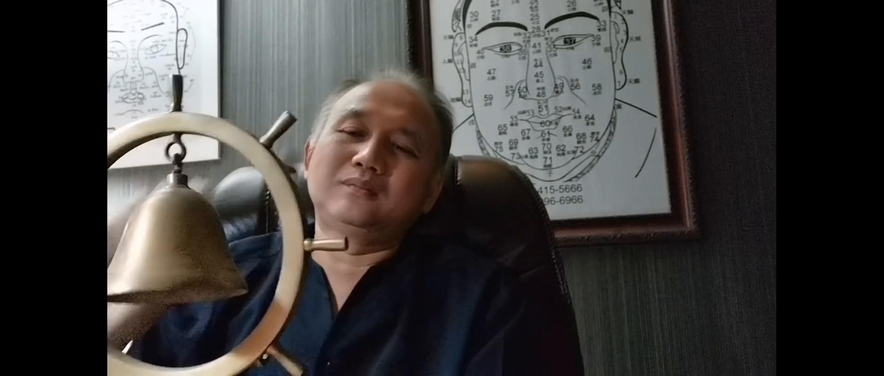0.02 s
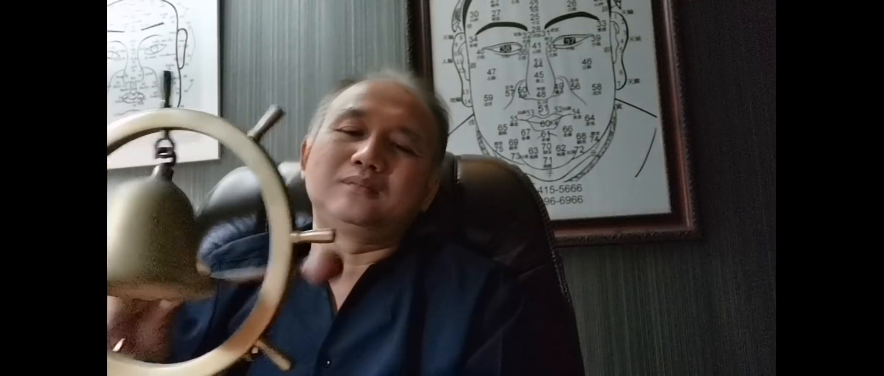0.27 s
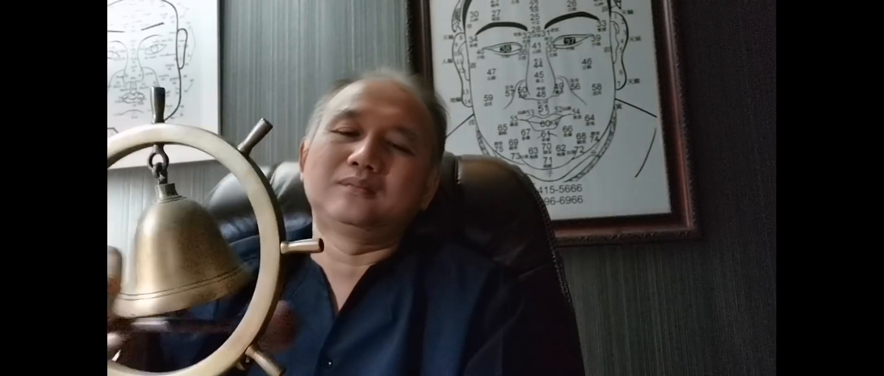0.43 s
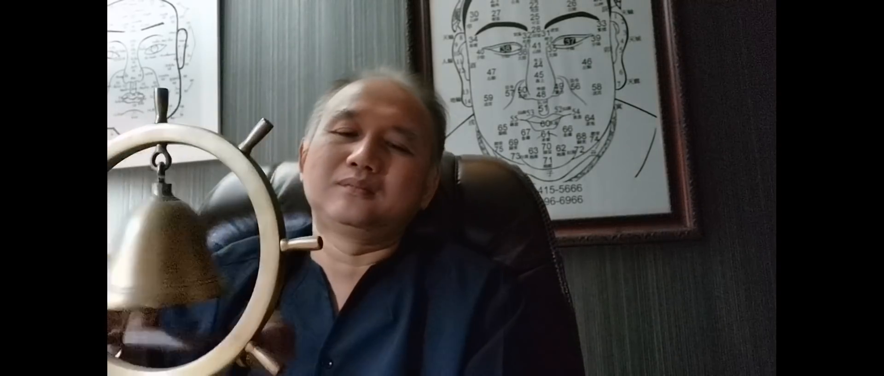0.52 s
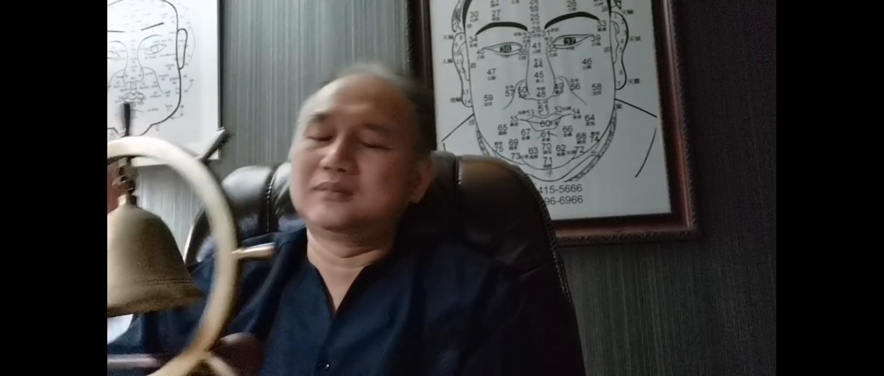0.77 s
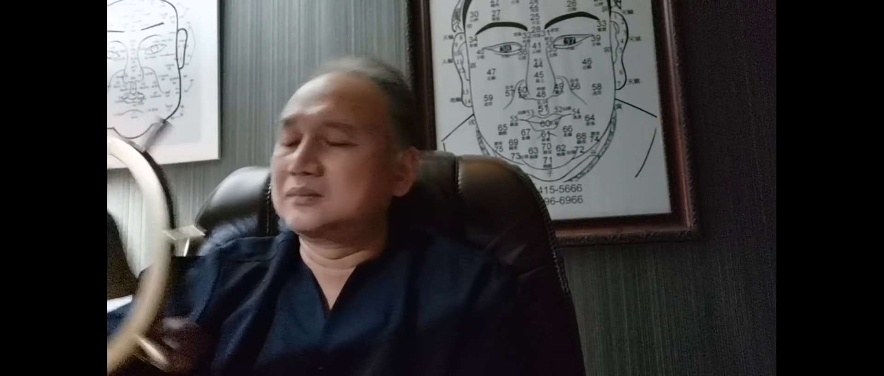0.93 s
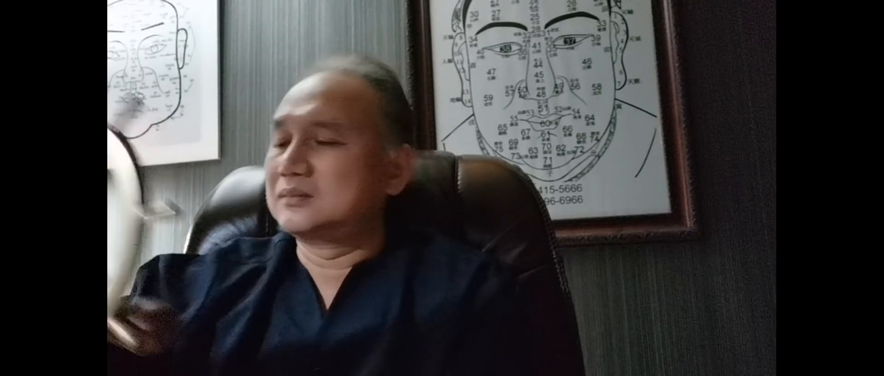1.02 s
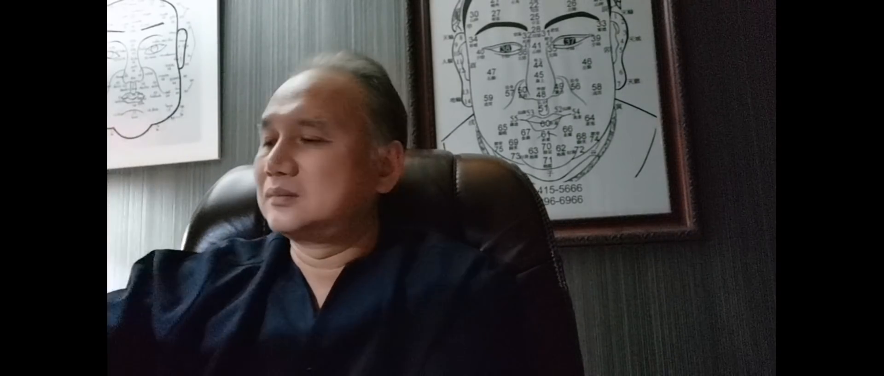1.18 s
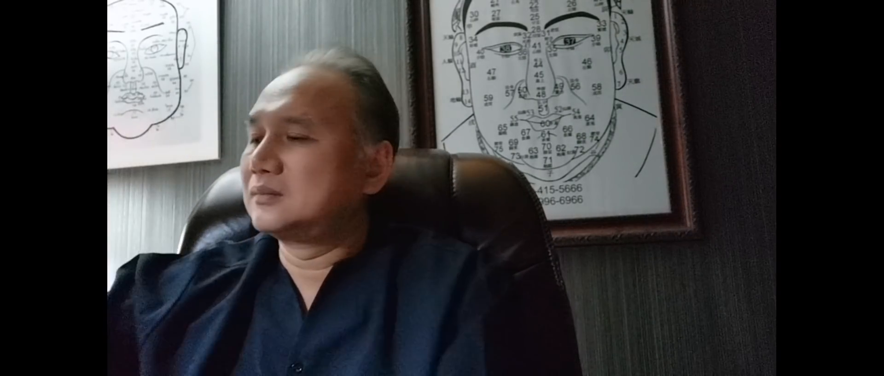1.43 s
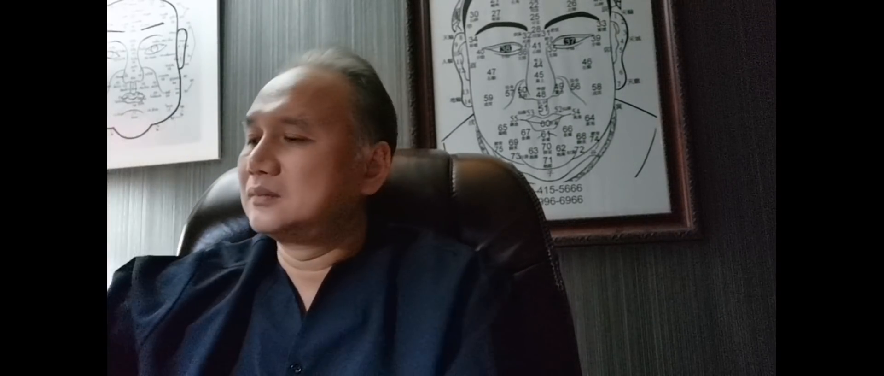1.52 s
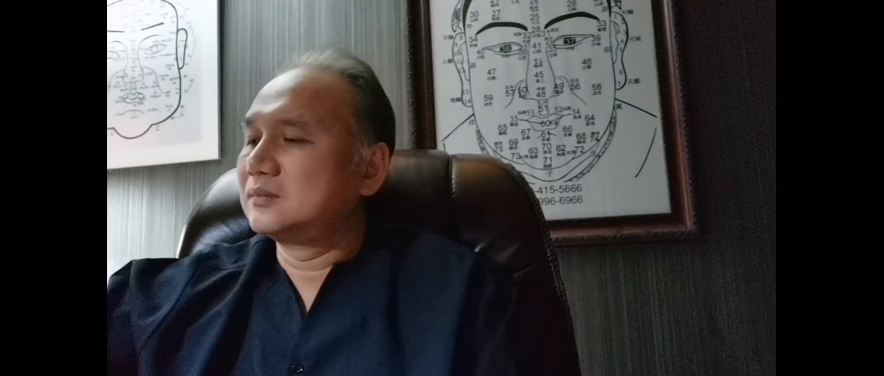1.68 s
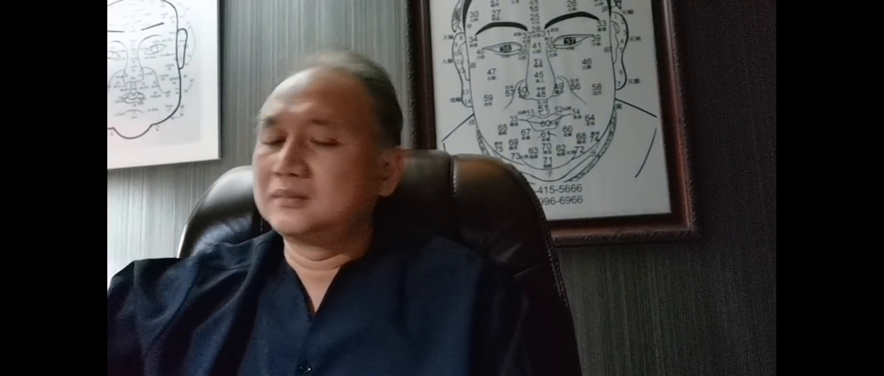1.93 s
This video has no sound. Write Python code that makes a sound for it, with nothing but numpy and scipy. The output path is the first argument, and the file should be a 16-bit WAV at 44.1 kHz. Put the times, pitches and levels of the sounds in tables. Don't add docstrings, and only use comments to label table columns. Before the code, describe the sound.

After a moment of low room hum, one bright bell stroke bursts out close by; its high partials die quickly, leaving a pure beating tone that swings side to side and fades, with tiny metal knocks from the stand.

```python
import sys
import numpy as np
from scipy import signal
from scipy.fft import rfft, irfft
from scipy.io import wavfile
from scipy.ndimage import uniform_filter1d

SR = 44100
rng = np.random.default_rng(int(sys.argv[2]) if len(sys.argv) > 2 else 0)


def boost(x):
    u = np.asarray(x, float) / 20
    return 10 ** u


def dump(signal):
    limited = np.clip(np.atleast_2d(signal).T, -1, 1)
    pcm = np.round(limited * 32767).astype(np.int16)
    wavfile.write(sys.argv[1], SR, pcm)


N = 85995
STRIKE_S = 0.2385

BELL_HZ = [1153.73, 1161.14, 2888.62, 2904.19, 4858.2, 4882.8, 2307.0, 2322.2]
# rms level/dB, fade/(dB/s), lobes/(rad per rad of swing), spill filling the nulls/(-1 to 1)
BELL_RING = [(-19, 5.5, 0.91, 0.12), (-22.5, 1.14, 0.49, 0.35), (-8.5, 18.5, 1.01, -.16),
             (-22.5, 22, 1.5, 0.01), (-17.5, 37, 1.2, -.81), (-20.5, 34, .65, 0.6), (-40.5, 14.5, 0.81, .4),
             (-44, 12, 0.72, 0.8)]
BELL_FACING = [(-0.5, 0.52, -0.099, 0.79), (-0.07, -1.6658, 0.047, 0.31), (0.73, 2, 0.32, 0.089),
               (2, 1.9, 1.14, 0.16), (2.5, 1.96, 0.0, 0.89), (-1.59, 2.39, 0.35, 0.49),
               (0.5, 2.97, 0.1, 0.43), (1.84, 0.43, 0.22, 0.16)]
# f/Hz, rms level/dB, fade/(dB/s)
SHORT_PARTIALS = [(4043, -44, 35), (6754, -25, 85), (7255, -29, 70), (8276, -22, 130), (10169, -32, 100),
                  (11160, -28, 140),
                  (4124, -31, 100), (5805, -49, 43), (8005, -37, 110), (7700, -47.5, 67), (13157, -38, 150),
                  (13600, -37.5, 200), (14519, -50.5, 170), (15569, -49.5, 300), (12118, -72, 120),
                  (9330, -57.5, 120), (6050, -54.5, 66), (1727, -54.5, 30), (13700, -31.5, 360),
                  (505, -43.5, 500)]
# t/s, swing/rad
SWING_ANGLE = [(0.24, 1.8), (0.32, -0.07), (0.4, -0.28), (0.48, -0.7), (0.55, -1.92), (0.63, -3.5),
               (0.7, -3.95), (0.78, -2.5), (0.85, -1.86), (1.0, -0.75), (1.2, -0.65), (1.4, -1.14),
               (1.55, 1.76), (1.7, 2.5), (1.82, 3.5), (1.95, 6)]
# t/s, level/dB
BELL_LEVEL = [
    (0.24, -10.5),
    (0.45, -0.5),
    (0.9, 1.06),
    (1.3, -0.15),
    (1.6, -9),
    (1.95, -9.5),
]
# t/s, lead/ms
LEFT_LEAD = [(0.24, -0.0035), (0.5, 0.0043), (0.75, 0.123), (0.95, 0.074), (1.2, 0.3), (1.45, 0.3),
             (1.7, -0.24), (1.95, 0.17)]
# f/Hz, level/(dB per Hz)
CRACK_COLOUR = [(150, -33), (800, -11), (2500, -4), (4200, -1.5), (6000, -18.5), (8000, -11), (12300, -29),
                (15000, -11)]
# t/s, level/dB, f/Hz, width/Hz, pan to left/dB
CLINK_EVENTS = [(0.03, -56.5, 950, 80, 0.5), (.495, -34, 13320, 30, 2), (.497, -46.5, 14500, 60, -13.5),
                (.5, -65, 10400, 900, -4), (.62, -44, 1500, 120, 1), (.62, -35.5, 2100, 400, -14.5),
                (0.618, -30, 3810, 1235, -5), (.62, -50, 6300, 150, -18), (.709, -33, 1930, 200, -2),
                (.709, -31.5, 1400, 400, 4.5), (0.71, -35.5, 4150, 400, -4.5), (0.71, -41, 9500, 1977, -11),
                (.93, -52.5, 6300, 200, -11.5), (1.36, -65, 7000, 60, 3), (1.36, -68, 6300, 100, -2.5),
                (1.38, -77.5, 10400, 400, 2.5), (1.57, -53.5, 880, 60, -0.5), (1.658, -40.5, 8970, 40, 2.5),
                (1.66, -43, 10240, 868, -3), (1.665, -52.5, 1990, 50, 0), (1.665, -54, 880, 80, 2),
                (.24, -34, 800, 120, 0), (.62, -47.5, 800, 200, 3), (.709, -56, 13440, 2020, 0.5)]
# f/Hz, T60/s
ROOM_DECAY = [(300, .4), (2000, 0.36), (8000, 0.28), (15000, 0.28)]
# f/Hz, level/(dB per Hz)
HUM_BEFORE = [(12, -57.5), (20, -36.5), (79, -10), (393, -15.5), (729, -38), (939, -21.5), (1110, -31.5),
              (5830, -48.5), (16500, -53.5)]
# f/Hz, level/(dB per Hz)
HUM_AFTER = [(20, -24.5), (130, -4.5), (220, -1), (400, -10), (550, -23.5), (900, -19.5), (2000, -35),
             (16500, -50.5)]
# t/s, rms level/dB
HUM_LEVEL = [(0, -53), (.04, -58), (.23, -57), (.3, -66.5), (.55, -63), (.8, -55.5), (1.95, -54.5)]
# f/Hz, likeness/(0-1)
HUM_LIKENESS = [(30, 1), (200, 0.86), (600, 0.34), (4000, 0.59)]


def read(points, hz):
    f, value = np.transpose(points)
    return np.interp(np.log(hz + 1), np.log(f + 1), value)


def curve(points, t):
    return np.interp(t, *np.transpose(points))


def mode(hz, db, fade_db, lobes, spill, angles, lags):
    t = np.arange(N) / SR
    since = np.maximum(t - STRIKE_S, 0)
    lead_s = curve(LEFT_LEAD, t) / 1000 * np.c_[[0.5, -0.5]]
    lobe = np.cos(lobes * curve(SWING_ANGLE, t) + np.c_[list(angles)]) - 1j * spill
    turns = hz * (since + lead_s) + np.c_[list(lags)]
    wave = (lobe * np.exp(2j * np.pi * turns)).real
    attack = np.minimum(since / 0.001, 1)
    return np.sqrt(2) * boost(db - fade_db * since) * attack * wave


def bell():
    pairs = np.zeros((2, N))
    for hz, ring, facing in zip(BELL_HZ, BELL_RING, BELL_FACING):
        pairs += mode(hz, *ring, facing[:2], facing[2:])
    return pairs * boost(curve(BELL_LEVEL, np.arange(N) / SR))


def shimmer():
    lobes, spill, split_hz = 2.4, 0.74, 26
    rows = SHORT_PARTIALS
    luck = rng.random((len(rows), 2, 5))
    out = np.zeros((2, N))
    for (hz, db, fade_db), both in zip(rows, luck):
        lower, upper = both
        out += mode(hz, db, fade_db, lobes, spill, np.pi * lower[:2], lower[2:4])
        upper_hz = hz + split_hz * upper[4]
        out += mode(upper_hz, db - 6, fade_db, lobes, spill, np.pi * upper[:2], upper[2:4])
    return out


def blow():
    crack_db, crack_s = -13, 0.0031
    thud_db, thud_hz, thud_s = -28, 80, 0.012
    since = np.maximum(np.arange(N) / SR - STRIKE_S, 0)
    colour = boost(read(CRACK_COLOUR, np.fft.rfftfreq(N, 1 / SR)))
    colour = colour / np.sqrt(np.mean(colour ** 2))
    noise = irfft(rfft(rng.standard_normal((2, N))) * colour, N)
    crack = boost(crack_db) * noise * (since > 0) * np.exp(-since / crack_s)
    thud = boost(thud_db) * np.sin(2 * np.pi * thud_hz * since) * np.exp(-since / thud_s)
    return crack, thud * boost([[2.0], [-2.0]])


def resonate(x, hz, width):
    r = np.exp(-np.pi * abs(width) / SR)
    w = 2 * np.pi * hz / SR
    return signal.lfilter([np.sin(w)], [1, -2 * r * np.cos(w), r * r], x)


def clinks():
    out = np.zeros((2, N))
    scrapes = rng.standard_normal((len(CLINK_EVENTS), 60)) * np.exp(-np.arange(60) / 15)
    for (s, db, hz, width, pan_db), scrape in zip(CLINK_EVENTS, scrapes):
        knock = np.r_[scrape, np.zeros(8000)]
        ring = resonate(resonate(knock, hz, width), hz, 3.7 * width)
        ring = ring / abs(ring).max()
        part = out[:, round(s * SR):][:, :len(ring)]
        part += boost([[db + pan_db / 2], [db - pan_db / 2]]) * ring[:part.shape[1]]
    return out


def room(x):
    taps = np.zeros((2, SR // 2))
    at = np.arange(120, SR // 2 - 20, 20)
    at = at + rng.integers(0, 20, (2, len(at)))
    np.put_along_axis(taps, at, rng.choice([-1., 1.], at.shape), 1)
    hz, t, z = signal.stft(taps, SR, nperseg=256)
    decay = boost(-60 * t / read(ROOM_DECAY, hz)[:, None])
    tail = signal.istft(z * decay, SR, nperseg=256)[1]
    return signal.fftconvolve(x, tail / np.linalg.norm(tail[0]), axes=1)[:, :N]


def hum():
    frames, hz = N // 256 + 5, np.fft.rfftfreq(1024, 1 / SR)
    a, b, c, d, patches = rng.standard_normal((frames, 513, 5)).T
    patches = uniform_filter1d(uniform_filter1d(patches, 4, 0), 8, 1)
    left, other = a + 1j * b, c + 1j * d
    same = np.clip(read(HUM_LIKENESS, hz), -1, 1)[:, None]
    right = same * left + np.sqrt(1 - same ** 2) * other
    z = np.array([left, right]) * boost(1.6 * patches / patches.std())
    before, after = boost(read(HUM_BEFORE, hz)), boost(read(HUM_AFTER, hz))
    before = (before / np.linalg.norm(before))[:, None]
    after = (after / np.linalg.norm(after))[:, None]
    colour = np.where(np.arange(frames) * 256 / SR < STRIKE_S, before, after)
    noise = signal.istft(z * colour, nperseg=1024, noverlap=768)[1][:, :N]
    return noise / noise.std() * boost(curve(HUM_LEVEL, np.arange(N) / SR))


def scene():
    crack_wet_db, clink_wet_db, shimmer_wet_db = -1.5, 9, -4.5
    crack, thud = blow()
    top, hits = shimmer(), clinks()
    close = bell() + top + hits + crack + thud
    to_room = boost(crack_wet_db) * crack + boost(clink_wet_db) * hits + boost(shimmer_wet_db) * top
    return close + room(to_room) + hum()


def low_pass(x):
    return signal.sosfilt(signal.butter(12, 16980, fs=SR, output="sos"), x)


def record(dry):
    return low_pass(dry)


dry = scene()
out = record(dry)
dump(out)
```